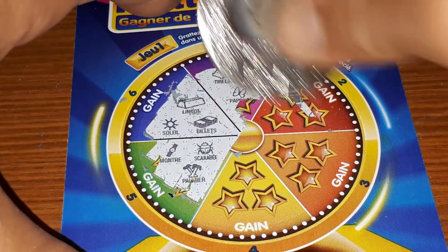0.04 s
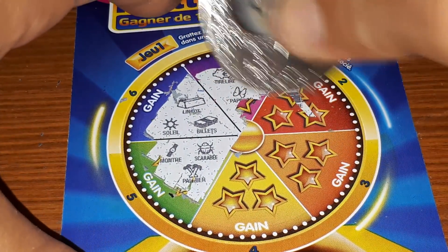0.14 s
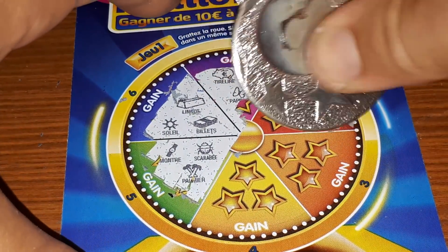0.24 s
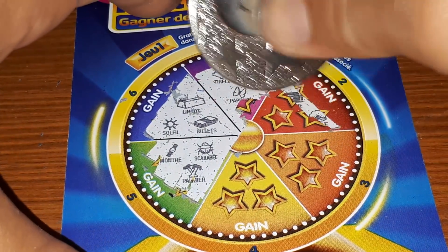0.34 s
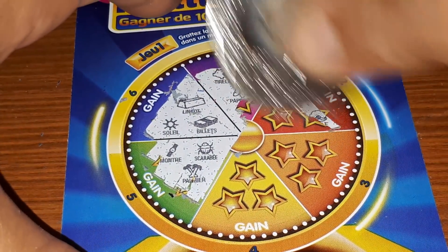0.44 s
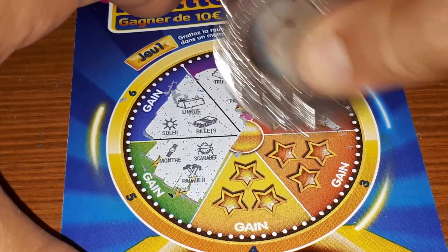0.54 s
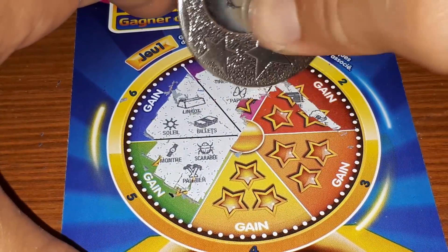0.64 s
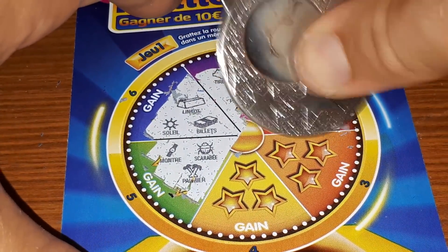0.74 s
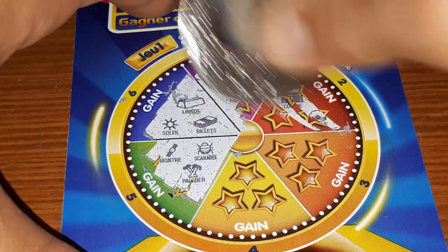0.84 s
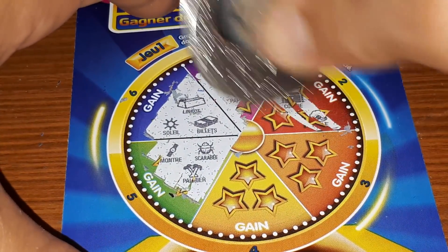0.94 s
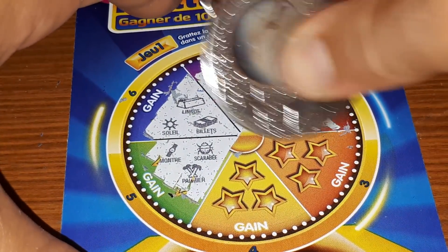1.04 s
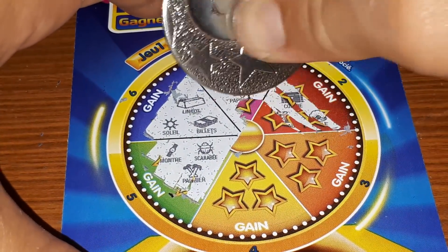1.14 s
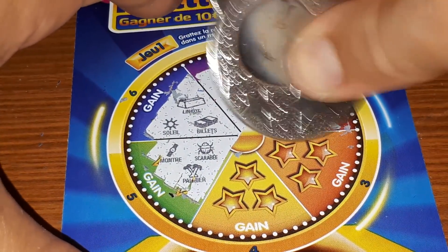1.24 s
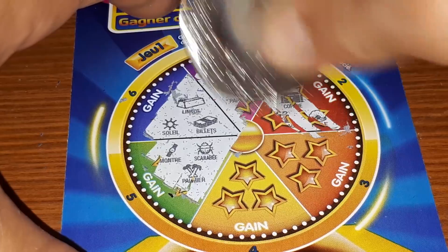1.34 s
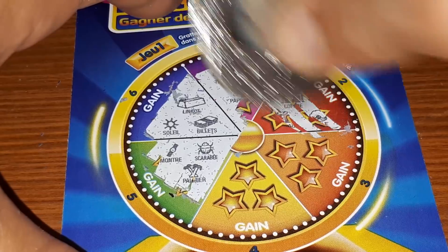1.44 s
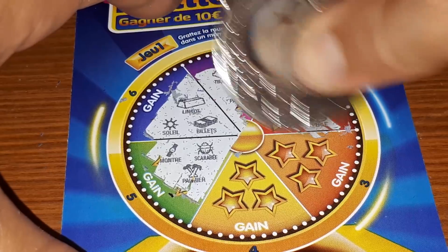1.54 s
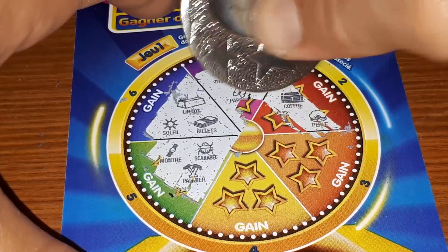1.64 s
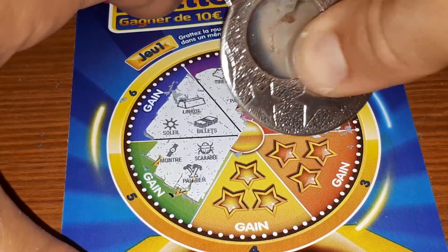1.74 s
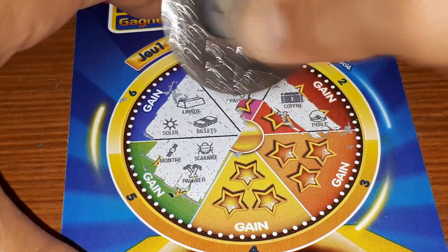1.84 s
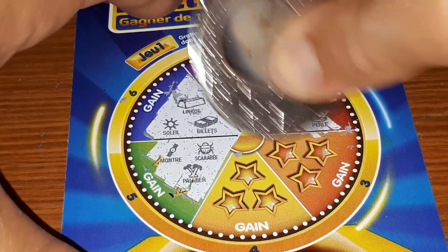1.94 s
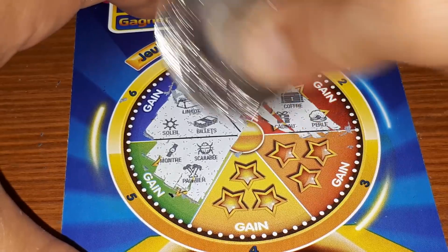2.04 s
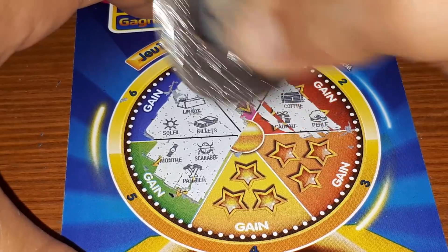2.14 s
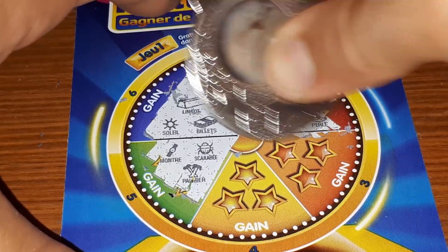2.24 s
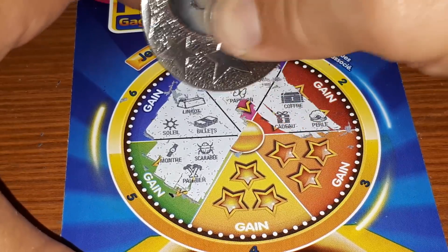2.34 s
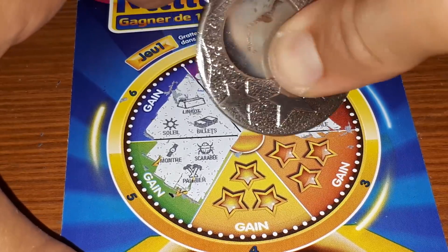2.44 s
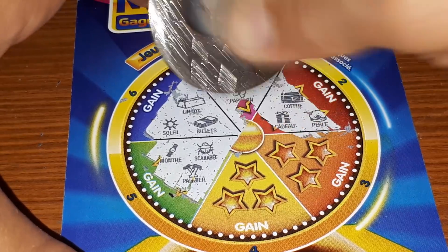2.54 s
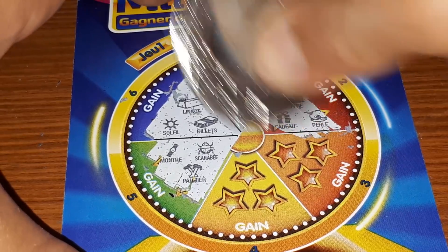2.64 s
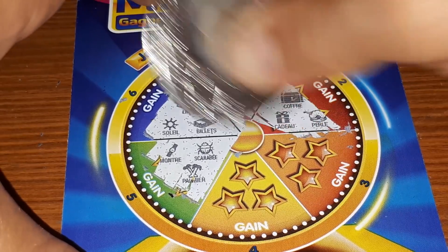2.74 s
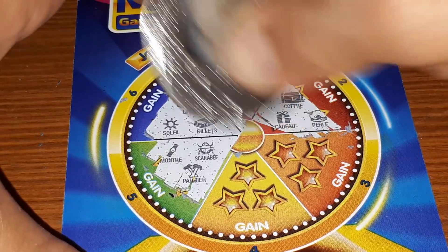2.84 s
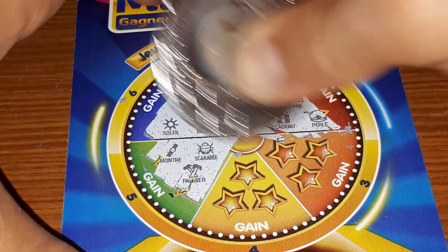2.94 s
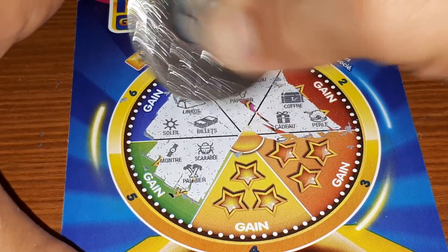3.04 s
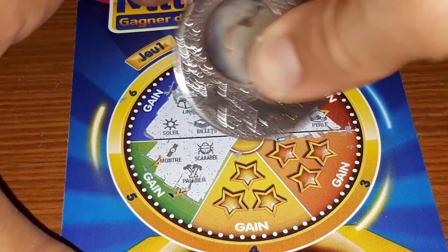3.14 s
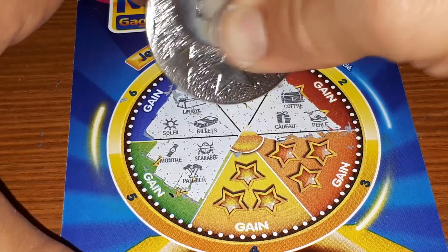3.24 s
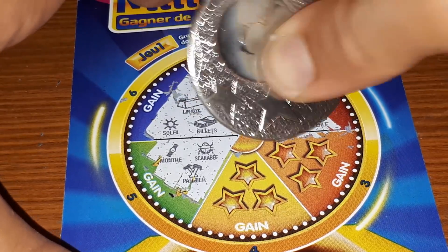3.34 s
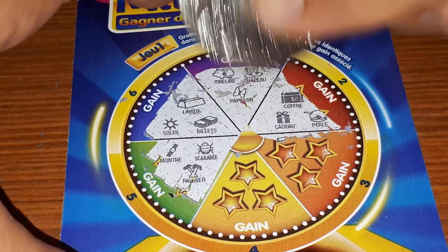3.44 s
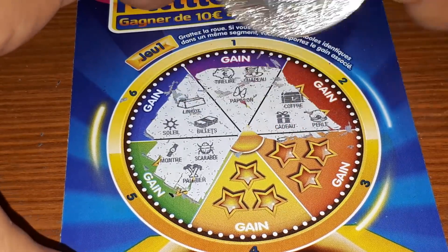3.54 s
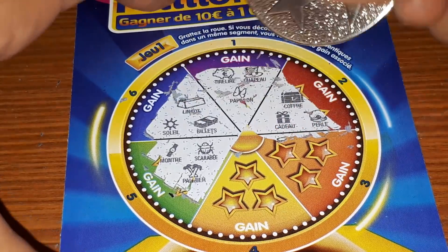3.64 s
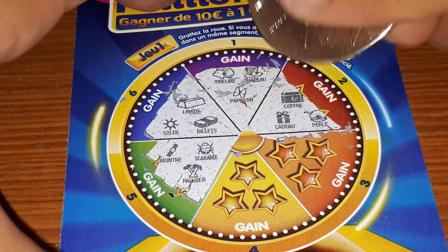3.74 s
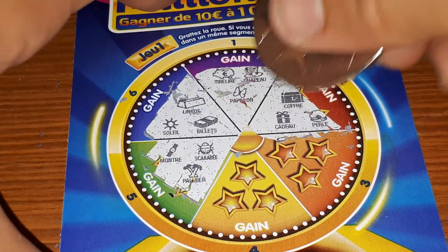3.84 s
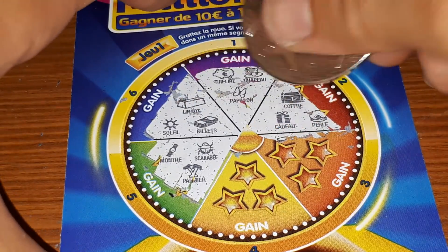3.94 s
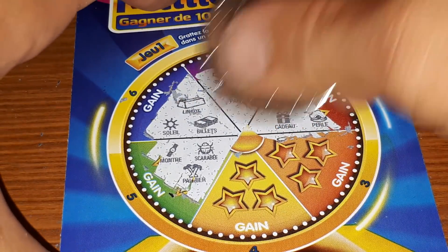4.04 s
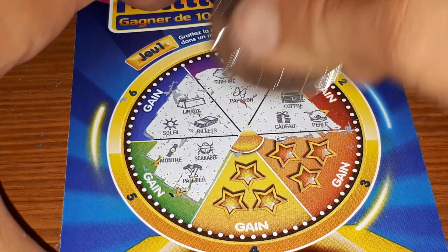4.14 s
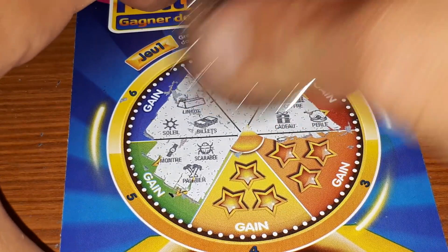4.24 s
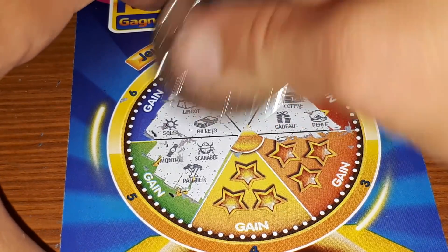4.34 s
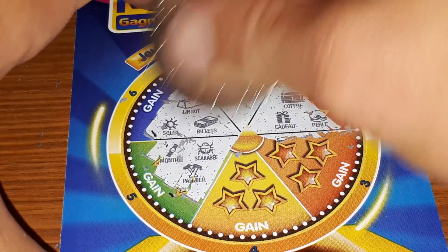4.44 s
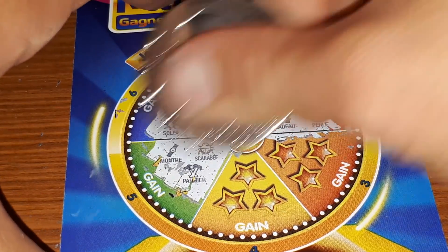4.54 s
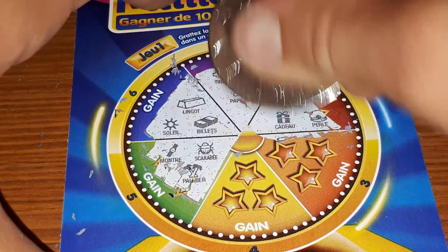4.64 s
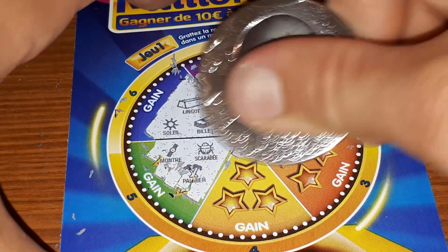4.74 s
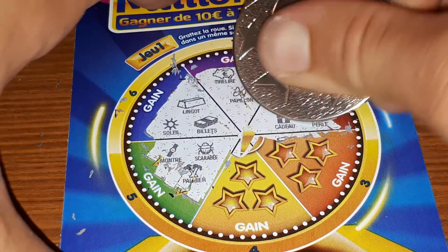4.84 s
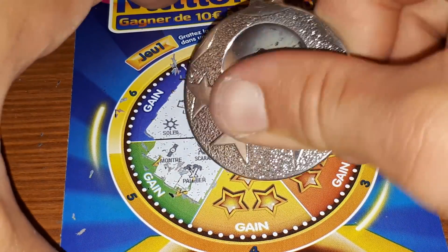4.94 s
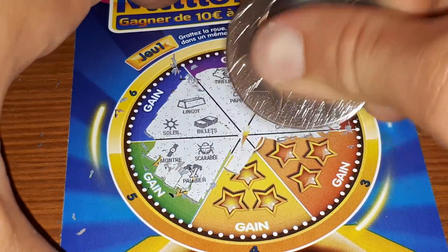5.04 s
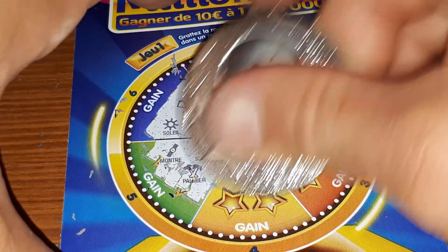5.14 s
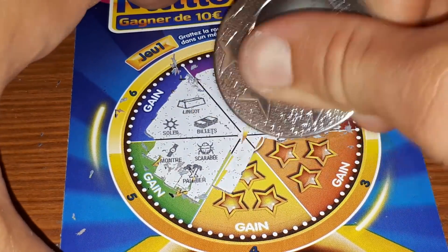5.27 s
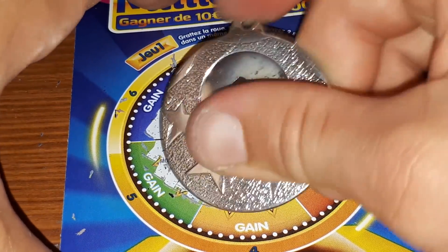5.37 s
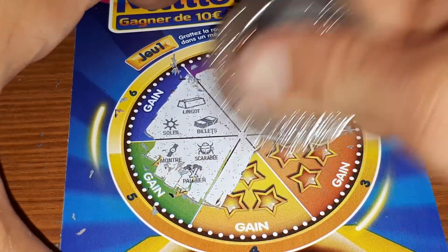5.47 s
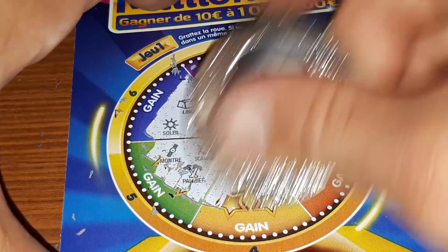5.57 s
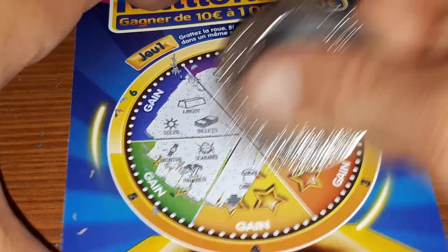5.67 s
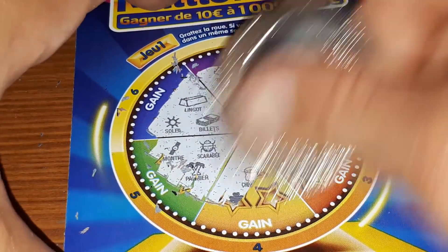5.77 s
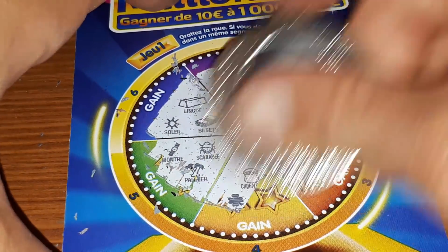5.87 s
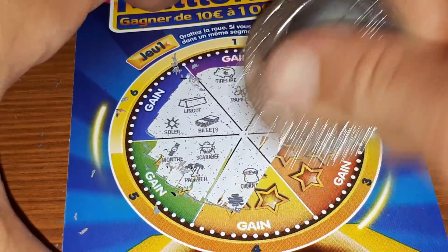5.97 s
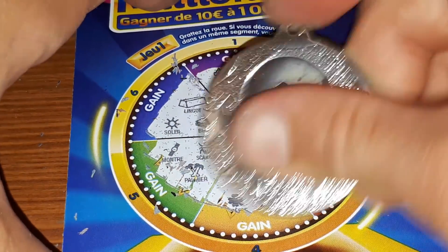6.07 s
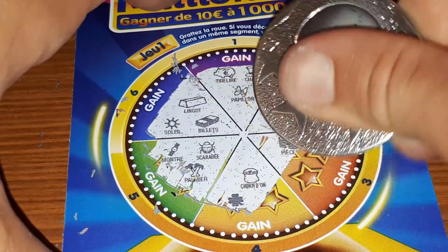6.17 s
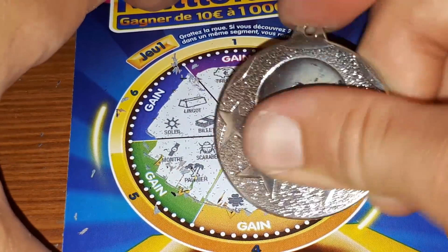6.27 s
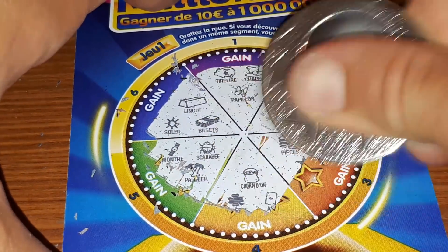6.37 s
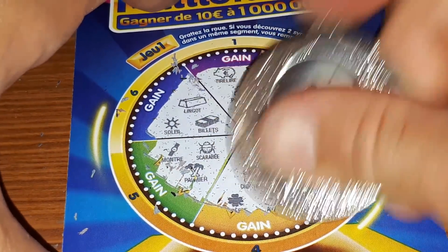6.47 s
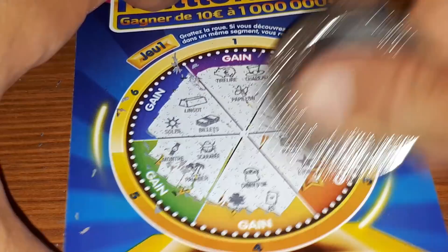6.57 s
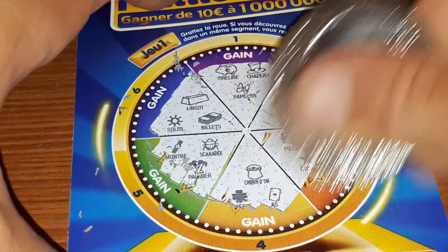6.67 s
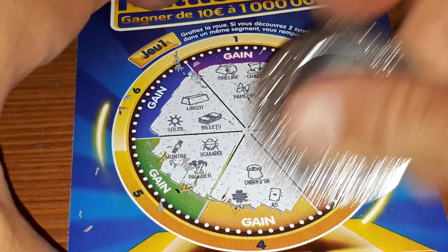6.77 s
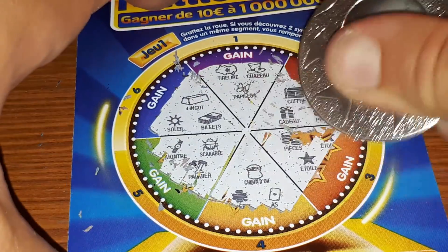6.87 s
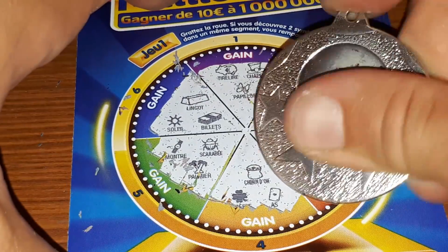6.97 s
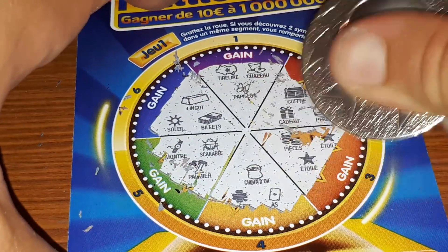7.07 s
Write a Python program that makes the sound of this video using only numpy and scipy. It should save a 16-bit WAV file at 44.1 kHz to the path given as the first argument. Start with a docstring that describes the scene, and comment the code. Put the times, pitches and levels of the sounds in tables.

```python
"""A large coin scrapes the coating off a paper ticket on a wooden table, close to a stereo microphone.
About nine times a second the rim judders into the table top, rasps near 1 kHz and shreds the coating
into hissing grains. Forward strokes are bright, back strokes heavy; now and then the rim catches or
chatters. Halfway the coin is lifted and set down with a thud. Behind it lies a small, still room."""
import sys
import numpy as np
from scipy import signal
from scipy.fft import rfft, irfft
from scipy.io import wavfile

SR = 44100
rng = np.random.default_rng(int(sys.argv[2]) if len(sys.argv) > 2 else 0)


def dump(signal):
    """Clip the signal to [-1, 1] and save it as 16-bit WAV at the path in sys.argv[1]."""
    limited = np.clip(np.atleast_2d(signal).T, -1, 1)
    pcm = np.round(limited * 32767).astype(np.int16)
    wavfile.write(sys.argv[1], SR, pcm)


N = 313551
TAPS = 8192
TIME, FILTER_HZ = np.arange(N) / SR, np.fft.rfftfreq(TAPS, 1 / SR)

# Tone of the still room and of its reflections: freq_hz, level_db
ROOM_TONE = [(25, -16), (50, -8), (90, 0), (150, -5), (235, -12), (290, -1), (430, -18), (900, -19),
             (2000, -25), (8000, -31), (15500, -32)]
REFLECTION_COLOUR = [(100, -32), (400, -12.5), (1000, -10), (2200, -1.5), (4200, -7), (8000, -7.5),
                     (15000, -5.5)]
# Time the room takes to fall by 60 dB: freq_hz, decay_s
ROOM_DECAY = [(150, 0.37), (1000, 0.15), (4000, 0.44), (15000, 0.3)]
# The left microphone hears more treble: freq_hz, left_over_right_db
LEFT_LEAD = [(100, .7), (350, .3), (700, 1.4), (2400, 1.4), (4400, 3.3), (15000, 3.6)]

# Resonances: pitch_hz, width_hz, lift_db
TABLE_MODES = [(124.9, 5, 12), (170.3, 6.6, 11.5), (202, 10, 8), (291.9, 13.7, 14.5), (331.7, 9.3, 11.5),
               (472.4, 16.4, 11), (574, 16, 10.5), (650, 25, 8.5), (716.7, 28, 13.5), (906.5, 33, 12),
               (971, 36, 11.5), (1009, 18, 12.5), (1230, 17, 11)]  # table top and ticket
CARD_MODES = [(1600, 50, 13), (1860, 120, 3)]  # stiff card, damped by the fingers
RIM_MODES = [(954, 250, 15), (1566, 166, 17), (2820, 150, 16), (4240, 260, 28)]  # rim pressed hard, ringing briefly
LIFTED_MODES = [(2820, 53, 19), (3140, 80, 10)]  # coin in the air
FORWARD_MODES = [(4794, 140, 10.5), (9610, 140, 12), (11840, 500, 3.5)]  # coin pushed
BACK_MODES = [(2842, 41, 11.2), (5250, 500, 1.2), (9360, 200, 7.1)]  # coin pulled
THUMB_MODES = [(4108, 95, 40), (9360, 84, 27)]  # the coin's main ring under the thumb
# Broad colour of the force behind each sound: freq_hz, relative_db
TICK_COLOUR = [(100, -21), (800, 1), (3000, -6), (5000, -15), (16000, -16)]
THUD_COLOUR = [(25, -25), (70, -11), (140, -2.5), (210, 2), (290, 6), (400, -2.5), (900, -9), (1650, -17.5),
               (2300, -47), (4500, -40), (16000, -48)]
SNAP_COLOUR = [(1000, -30), (4000, -7), (8000, -1), (15000, 0)]
KNOCK_COLOUR = [(40, -30.5), (150, 10), (400, -11), (900, 12), (1400, -16), (2200, -12), (4000, -37),
                (16000, -41)]
CLACK_COLOUR = [(60, -24), (400, -29.5), (900, 10), (1400, 3), (2200, -3.5), (4000, -21.5), (7000, -11),
                (11000, -24), (16000, -11)]
JUDDER_COLOUR = [(25, -44), (55, -17.5), (100, -13), (160, 1.5), (260, -2), (420, -3), (700, -7),
                 (900, -12.5), (1400, -39), (3000, -38), (16000, -50)]
RASP_COLOUR = [(40, -40), (90, 0.5), (250, -4.5), (600, -9.5), (950, 3.5), (1180, 1), (1400, -10.5),
               (2000, -9), (3200, -24.5), (6000, -42), (16000, -47)]
FORWARD_COLOUR = [(100, -13), (900, -0.5), (1900, 5.5), (3300, -0.5), (4500, -2.5), (6500, -0.5),
                  (8500, -6.5), (11000, -7), (15500, -11.5)]
BACK_COLOUR = [(100, -31), (900, 13), (2000, 2.5), (3400, 1.5), (5000, 1.5), (7000, -2.5), (8700, -6),
               (11000, -10.5), (15500, -10.5)]
RING_COLOUR = [(1500, -24), (3500, -14.5), (4500, -5), (7000, 0), (9500, -13), (13000, -29)]

# Single blows: start_s, level_db
LIFT_TICKS = [(3.645, -51)]  # coin in the air
LANDINGS = [(3.944, -20.5), (3.95, -18.5)]  # coin set down
FLAKE_SNAPS = [(4.070, -48), (4.293, -38), (4.513, -45)]  # hard flakes breaking
# The rim chatters: start_s, length_s, level_db, pitch_hz
CHATTERS = [(1.364, 0.033, -24, 952), (1.474, 0.02, -32, 897), (1.841, 0.0074, -26.5, 990),
            (1.848, 0.012, -20, 946), (5.143, 0.024, -27, 920), (5.352, 0.021, -25.5, 990),
            (5.382, 0.012, -25.5, 1012), (5.487, 0.026, -31, 943), (5.889, .022, -31.5, 1012)]
# The rim catches and snaps free: start_s, level_db, sharpness (0 dull knock to 1 hard clack)
CATCHES = [(3.024, -29, 0.14), (5.9487, -18, 0.6), (5.951, -23.5, 0.46), (6.617, -19, 0.6),
           (6.8517, -12.5, 0.8), (6.8544, -19.5, 0.9)]
# The coin goes forward and back by turns: start_s, length_s, force_db, shred_db
STROKES = [(0.004, 0.13, -39, -54.5), (0.16, 0.1, -40, -46.0), (0.256, 0.18, -39.5, -52.5),
           (0.435, 0.11, -35.0, -52.5), (0.552, 0.11, -33, -53.0), (0.698, 0.1, -33.5, -58.0),
           (0.815, 0.12, -36.5, -45.5), (0.957, 0.082, -35, -55), (1.068, 0.11, -35.5, -47.5),
           (1.205, 0.097, -34, -58), (1.319, 0.11, -33, -53.0), (1.449, 0.086, -34, -59.0),
           (1.563, 0.087, -33.5, -51.5), (1.677, 0.11, -37.5, -62), (1.817, 0.082, -32, -58),
           (1.898, 0.11, -36, -48.5), (2.03, 0.098, -36.5, -41.5), (2.141, 0.11, -36.5, -52.5),
           (2.273, 0.094, -31.5, -49.0), (2.373, 0.11, -34.5, -58.5), (2.518, 0.083, -34.5, -54.5),
           (2.619, 0.1, -34, -61.5), (2.743, 0.085, -35.0, -46.5), (2.837, 0.091, -35.5, -47.0),
           (2.947, 0.11, -35.5, -51.5), (3.045, 0.11, -39.5, -51.5), (3.17, 0.096, -39, -55.5),
           (3.265, 0.15, -43.5, -65.5), (4.007, 0.11, -40.5, -66.5), (4.105, 0.13, -46.0, -79.5),
           (4.223, 0.11, -36, -60), (4.341, 0.11, -44.5, -79.0), (4.442, 0.11, -35.0, -59),
           (4.52, 0.17, -39, -68.5), (4.669, 0.097, -38, -51.0), (4.767, 0.086, -37.5, -48),
           (4.875, 0.11, -33.5, -45.5), (4.996, 0.089, -38.5, -47.0), (5.096, 0.11, -32.5, -43.5),
           (5.219, 0.11, -36.5, -58), (5.318, 0.104, -34, -42), (5.415, 0.14, -37.5, -57),
           (5.553, 0.086, -32.5, -44.5), (5.639, 0.125, -39.5, -44.5), (5.748, 0.12, -36.5, -47.0),
           (5.856, 0.13, -37, -47.5), (5.965, 0.12, -39, -44.5), (6.082, 0.13, -37, -42.5),
           (6.199, 0.11, -39.5, -44.5), (6.317, 0.12, -38.5, -43), (6.436, 0.098, -37.5, -46.5),
           (6.541, 0.12, -38.5, -43.5), (6.662, 0.12, -37.5, -54.0), (6.781, 0.11, -36.5, -44),
           (6.894, 0.11, -36, -50.5), (7.004, 0.128, -35.0, -48.0)]
# The rim digs in, less once the coin is held flatter: time_s, judder_over_force_db
DIG_FORWARD = [(0, -7), (3.3, -11), (4.2, -10.5), (5.5, -16), (7.1, -18)]
DIG_BACK = [(0, 3.5), (1.9, 2), (3.3, 5), (4.4, -4.5), (7.1, -2)]
# How freely the coin rings under the thumb: time_s, ring_over_shred_db
FREE_FORWARD = [(0, -2), (.5, -10), (1, -1.5), (2.5, -2.5), (2.8, 8.5), (4.4, 2), (7.1, 0)]
FREE_BACK = [(0, -19), (1.4, 0), (2.1, -8), (2.7, 1), (4.4, -8), (5.5, -21), (6.6, -9)]
# Resonance of the rim resting on the card, shifting with the grip: time_s, pitch_hz
CONTACT_PITCH = [(0, 872), (1.5, 917), (2.8, 959), (4.2, 950), (5.2, 1010), (5.9, 1008), (6.6, 1001),
                 (7.1, 950)]
# How finely the coating shreds: time_s, treble_lift_db
FINENESS = [(0, 1), (1.2, 4.5), (2.2, -3), (3.2, 9), (4.1, 9.5), (4.8, -3), (5.3, -6), (5.7, 2.5),
            (6.3, -0.5), (7.1, -1)]


def gain_of(db):
    return 10 ** (np.asarray(db) / 20)


def unit_rms(x):
    return x / np.sqrt(np.mean(x ** 2) + 1e-20)


def at_freq(points, hz):
    freq_hz, value = np.transpose(points)
    return np.interp(np.log(hz + 1), np.log(freq_hz + 1), value)


def at_time(points, time_s):
    return np.interp(time_s, *np.transpose(points))


def add(mix, start_s, sound):
    part = mix[max(round(start_s * SR), 0):][:len(sound)]
    part += sound[:len(part)]


def through(force, body):
    return signal.oaconvolve(force, body)[:N]


def wander(rate_hz):
    """Smooth random drift of unit power, mostly slower than the given rate."""
    hz = np.fft.rfftfreq(N, 1 / SR)
    return unit_rms(irfft(rfft(rng.standard_normal(N)) * np.exp(-(hz / rate_hz) ** 2), N))


def grains(per_s, spread_db):
    """Random tiny slips of uneven size, at unit power."""
    size = gain_of(spread_db * np.clip(rng.standard_normal(N), -2, 2)) * rng.choice([-1, 1], N)
    return unit_rms(size * (rng.random(N) < per_s / SR))


def response(colour, modes):
    """A body's impulse response at unit energy: a broad colour lifted by ringing resonances."""
    lifts = sum((gain_of(lift_db) ** 2 - 1) / (1 + (2 * (FILTER_HZ - pitch_hz) / width_hz) ** 2)
                for pitch_hz, width_hz, lift_db in modes)
    gain = gain_of(at_freq(colour, FILTER_HZ)) * np.sqrt(1 + lifts)
    log_gain = np.log(np.concatenate([gain, gain[-2:0:-1]]))
    minimum_phase = np.exp(np.conj(signal.hilbert(log_gain)))
    ring = np.fft.ifft(minimum_phase).real[:TAPS // 2]
    return ring / np.linalg.norm(ring)


def resonate(force, pitch_hz, width_hz):
    """Two resonators in series that follow the pitch and keep the power of noise."""
    carrier = np.exp(2j * np.pi * np.cumsum(pitch_hz * np.ones(N)) / SR)
    pole = np.exp(-np.pi * width_hz / SR)
    ring = force / carrier + 1e-18
    for _ in range(2):
        ring = signal.lfilter([1 - pole], [1, -pole], ring)
    return (carrier * ring).real * np.sqrt(8 / (1 - pole))


def blow(body, crumble_s, crumble):
    """One sharp push and a short crumbling after it, rung through a body; peak 1."""
    t = TIME[:TAPS // 8]
    force = crumble * rng.standard_normal(len(t)) * np.exp(-t / crumble_s)
    force[0] += 1
    sound = signal.fftconvolve(force, body)
    return sound / abs(sound).max()


def room_tone(level_db=-67, apart=0.61):
    """Faint steady air of the room, mostly common to both microphones."""
    noise = rng.standard_normal(N) + apart * rng.standard_normal((2, N))
    colour = gain_of(at_freq(ROOM_TONE, np.fft.rfftfreq(N, 1 / SR)))
    return gain_of(level_db) * unit_rms(irfft(rfft(noise) * colour, N))


def room_reflections(sound, first_s=.0015, per_s=4000):
    """Sparse reflections from nearby surfaces and walls, different at each microphone."""
    count = SR // 2
    echoes = rng.choice([-1., 1.], (2, count)) * (rng.random((2, count)) < per_s / SR)
    echoes *= TIME[:count] > first_s
    hz, t, spectrum = signal.stft(echoes, SR, nperseg=256)
    fade = gain_of(-60 * t / at_freq(ROOM_DECAY, hz)[:, None])
    fade /= np.sqrt(np.mean(fade ** 2, axis=1, keepdims=True))
    fade *= gain_of(at_freq(REFLECTION_COLOUR, hz))[:, None]
    tail = signal.istft(spectrum * fade, SR, nperseg=256)[1] / np.linalg.norm(echoes[0])
    return signal.fftconvolve(sound[None], tail, axes=1)[:, :N]


def hand_echoes(shared=.45, apart=.7, fade_s=.0016):
    """Direct path and close echoes off hand, coin and table to each microphone, for one hand position."""
    t = TIME[:TAPS // 16]
    echoes = rng.standard_normal((3, len(t))) * np.exp(-t / fade_s)
    echoes /= np.linalg.norm(echoes, axis=1, keepdims=True)
    paths = shared * echoes[0] + apart * echoes[1:]
    paths[:, 0] = 1
    return paths / np.linalg.norm(paths, axis=1, keepdims=True)


def set_down():
    """The lifted coin ticks faintly, then lands on the ticket and the table top booms."""
    out = np.zeros(N)
    tick, thud = response(TICK_COLOUR, LIFTED_MODES), response(THUD_COLOUR, TABLE_MODES + CARD_MODES)
    for start_s, level_db in LIFT_TICKS:
        add(out, start_s, gain_of(level_db) * blow(tick, crumble_s=.0034, crumble=.35))
    for start_s, level_db in LANDINGS:
        add(out, start_s, gain_of(level_db) * blow(thud, crumble_s=.006, crumble=.03))
    return out


def flake_snaps():
    """Hard flakes of coating break under the rim with a thin, bright tick."""
    out, coin = np.zeros(N), response(SNAP_COLOUR, BACK_MODES)
    for start_s, level_db in FLAKE_SNAPS:
        add(out, start_s, gain_of(level_db) * blow(coin, crumble_s=.001, crumble=.3))
    return out


def rim_chatters(overtone_db=-24):
    """Stick and slip lock to the rim's resonance for a few hundredths of a second at most."""
    out, drift = np.zeros(N), 0.033 * wander(rate_hz=84)
    for start_s, length_s, level_db, pitch_hz in CHATTERS:
        bend = drift[int(start_s * SR):][:int(length_s * SR)]
        phase = 2 * np.pi * np.cumsum(pitch_hz * (1 + bend)) / SR
        tone = np.sin(phase) + gain_of(overtone_db) * np.sin(2 * phase)
        add(out, start_s, gain_of(level_db) * np.hanning(len(phase)) * tone)
    return out


def strokes(speed_up_share=0.54, brake_s=0.033):
    """The hand's moves: start_s, fastest_s, end_s, force_db, shred_db, forward (true or false)."""
    for k, (start_s, length_s, force_db, shred_db) in enumerate(STROKES):
        end_s = start_s + length_s
        landed = end_s > LANDINGS[0][0]  # once set down, the coin starts again with a back stroke
        forward = (k + landed) % 2 == 0
        fastest_s = start_s + speed_up_share * length_s if forward else end_s - brake_s
        yield start_s, fastest_s, end_s, force_db, shred_db, forward


def around(start_s, end_s, turn_s=.05):
    """The samples of a stroke with the turns on either side."""
    return slice(max(int((start_s - turn_s) * SR), 0), int((end_s + turn_s) * SR))


def speed(t, *times_s):
    """Speed of the coin, 0 to 1: half a sine through the given times."""
    return np.sin(np.pi * np.interp(t, times_s, np.linspace(0, 1, len(times_s)))).clip(0)


def friction(pace, bite):
    """Friction builds with speed; the harder the bite, the more it levels off."""
    return np.tanh(bite * pace ** 2) / np.tanh(bite)


def rim_catches(snag_delay_s=.038, snag_over_force_db=6, snag_sharpness=0.07):
    """The rim snags early in each back stroke and catches now and then: table knock plus coin clack."""
    out = np.zeros(N)
    knock, clack = response(KNOCK_COLOUR, TABLE_MODES + CARD_MODES), response(CLACK_COLOUR, RIM_MODES)
    snags = [(start_s + snag_delay_s, force_db + snag_over_force_db, snag_sharpness)
             for start_s, _, _, force_db, _, forward in strokes() if not forward]
    for start_s, level_db, sharpness in snags + CATCHES:
        body = (1 - sharpness) * knock + sharpness * clack
        add(out, start_s, gain_of(level_db) * blow(body, crumble_s=.005, crumble=.13))
    return out


def rim_motion(tremble=0.28):
    """Judder, rasp and speed rise and fall with each stroke; the fingers tremble through the turn."""
    judder, rasp, pace = np.zeros((3, N))
    for start_s, fastest_s, end_s, force_db, _, forward in strokes():
        span = around(start_s, end_s)
        stroke_pace = speed(TIME[span], start_s, end_s)
        dig_db = at_time(DIG_FORWARD if forward else DIG_BACK, fastest_s)
        trembling = tremble * np.hanning(len(stroke_pace))
        judder[span] += gain_of(force_db + dig_db) * (friction(stroke_pace, bite=1) + trembling)
        rasp[span] += gain_of(force_db) * friction(stroke_pace, bite=0.25)
        pace[span] += stroke_pace
    return judder, rasp, pace


def rim_scraping(judder_db=-2, rasp_db=-4, contact_db=-4, card_db=-16, grip_db=2.5, stiffen=0.042):
    """Coarse slips shake the table; finer ones rasp at the rim, whose resonance rises in mid-stroke."""
    judder, rasp, pace = rim_motion()
    grip = unit_rms(gain_of(grip_db * wander(rate_hz=80)))  # the rim bites unevenly
    slips = judder * grains(per_s=1900, spread_db=2.5) * grip
    rubs = rasp * grains(per_s=3000, spread_db=3) * grip
    edge = rasp * grains(per_s=3000, spread_db=4.5) * grip
    contact_hz = at_time(CONTACT_PITCH, TIME) * (1 + stiffen * pace + 0.0079 * wander(rate_hz=17))
    card_hz, card_width_hz, _ = CARD_MODES[0]
    return (gain_of(judder_db) * through(slips, response(JUDDER_COLOUR, TABLE_MODES + CARD_MODES))
            + gain_of(rasp_db) * through(rubs, response(RASP_COLOUR, TABLE_MODES + CARD_MODES))
            + gain_of(contact_db) * resonate(edge, contact_hz, width_hz=130)
            + gain_of(card_db) * resonate(edge, card_hz, 2 * card_width_hz))


def coating_shredding(forward_db=0.5, back_db=2, flutter_db=1.3, tear_speed=.55, sliding=0.18):
    """Above a threshold speed flakes tear off and ring the coin; the finest fly most at full speed."""
    flakes = unit_rms(grains(per_s=10000, spread_db=5) * gain_of(flutter_db * wander(rate_hz=130)))
    forward_hiss = gain_of(forward_db) * through(flakes, response(FORWARD_COLOUR, FORWARD_MODES))
    back_hiss = gain_of(back_db) * through(flakes, response(BACK_COLOUR, BACK_MODES))
    out, ring_force = np.zeros((2, N)), np.zeros(N)
    treble = signal.butter(2, 8000, "high", fs=SR)  # the finest flakes hiss above 8 kHz
    for start_s, fastest_s, end_s, _, shred_db, forward in strokes():
        span = around(start_s, end_s)
        pace = speed(TIME[span], start_s, fastest_s, end_s)
        tear = np.clip((pace - tear_speed) / (1 - tear_speed), 0, 1)
        hiss = (forward_hiss if forward else back_hiss)[span]
        fine = signal.filtfilt(*treble, hiss)
        fine_gain = gain_of(at_time(FINENESS, fastest_s)) * pace ** 0.41
        envelope = gain_of(shred_db) * (tear ** 0.96 + sliding * pace)
        shreds = envelope * (hiss - fine + fine_gain * fine)
        out[:, span] += signal.fftconvolve(shreds[None], hand_echoes(), axes=1)[:, :len(shreds)]
        free_db = at_time(FREE_FORWARD if forward else FREE_BACK, fastest_s)
        ring_force[span] += gain_of(shred_db + free_db) * tear ** 2
    ring_force *= grains(per_s=9000, spread_db=1)
    return out + through(ring_force, response(RING_COLOUR, THUMB_MODES))


def scene():
    """The coin close up on the table, with the room behind it."""
    coin = (coating_shredding() + rim_scraping() + rim_catches() + rim_chatters()
            + flake_snaps() + set_down())
    return coin + room_reflections(coin.mean(axis=0)) + room_tone()


def record(dry, cutoff_hz=15900):
    """A stereo pair, brighter on the left, with the very top of the treble cut off."""
    lead_db = at_freq(LEFT_LEAD, np.fft.rfftfreq(N, 1 / SR))
    heard = irfft(rfft(dry) * gain_of(np.array([lead_db, -lead_db]) / 2), N)
    low_pass = signal.firwin(511, cutoff_hz, window=("kaiser", 9), fs=SR)
    return signal.oaconvolve(heard, low_pass[None], "same")


dry = scene()
out = record(dry)
dump(out)
```